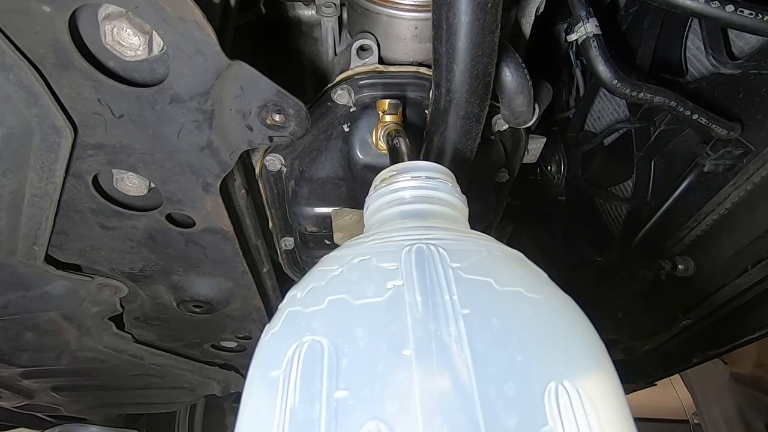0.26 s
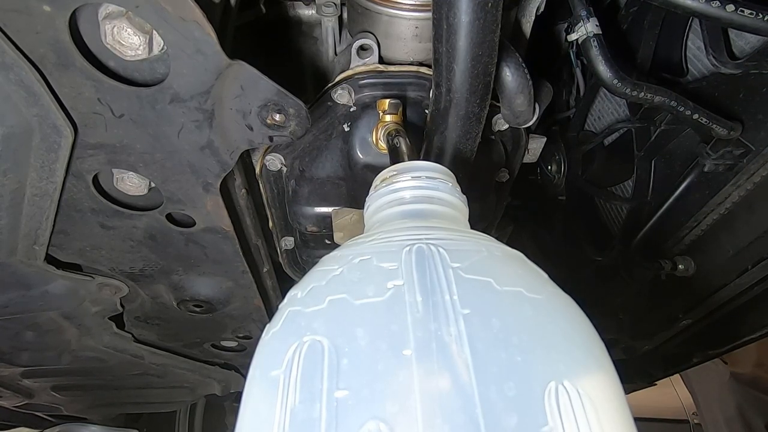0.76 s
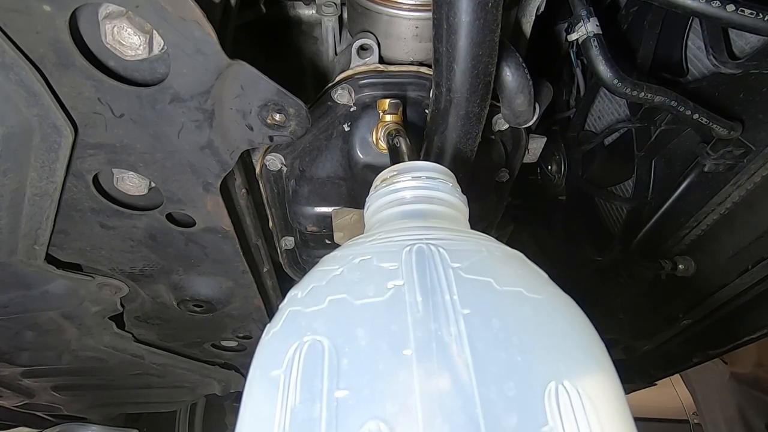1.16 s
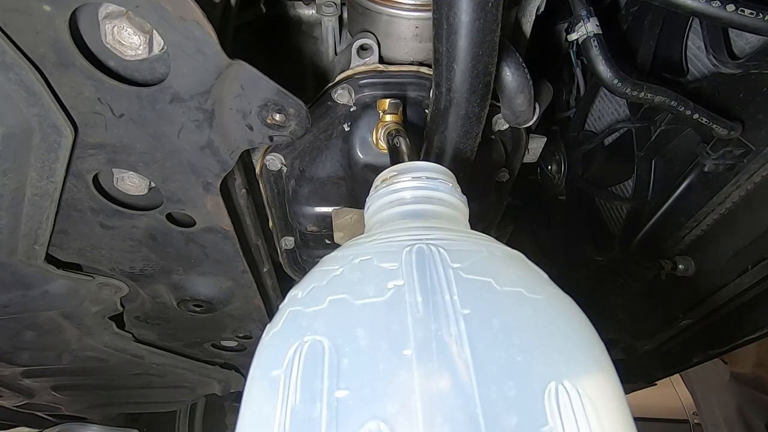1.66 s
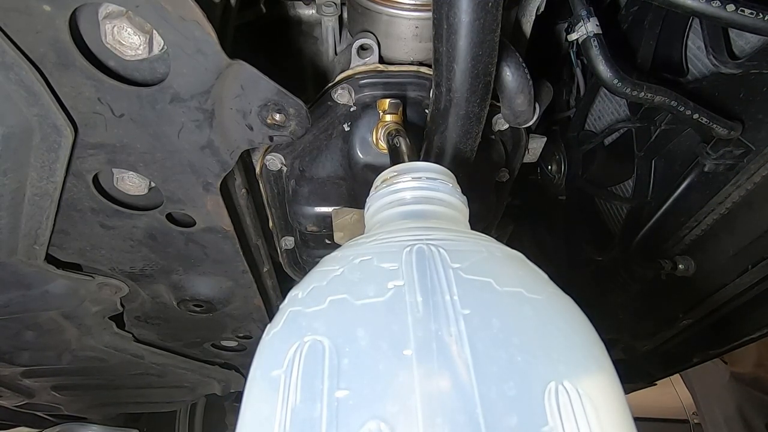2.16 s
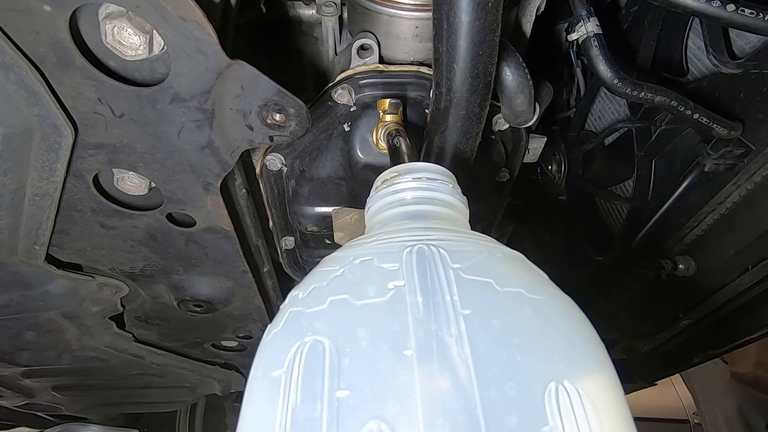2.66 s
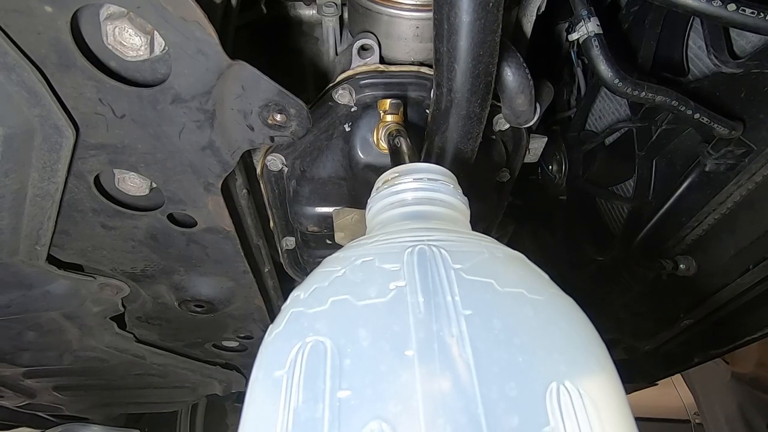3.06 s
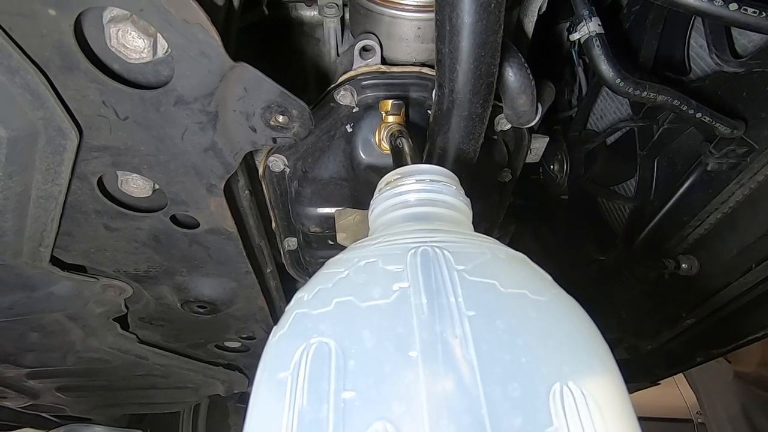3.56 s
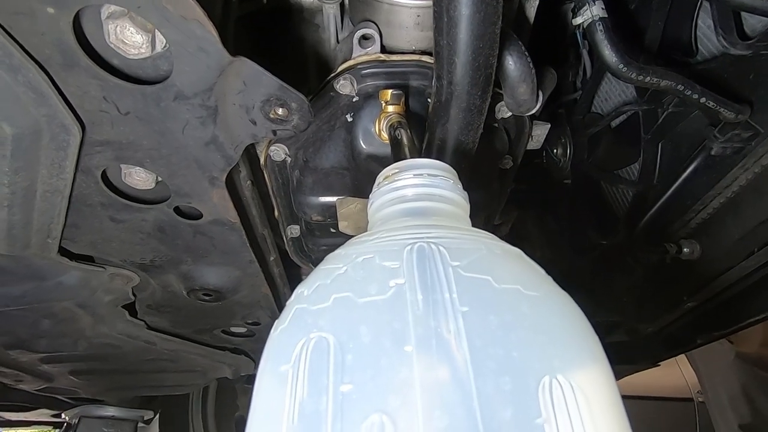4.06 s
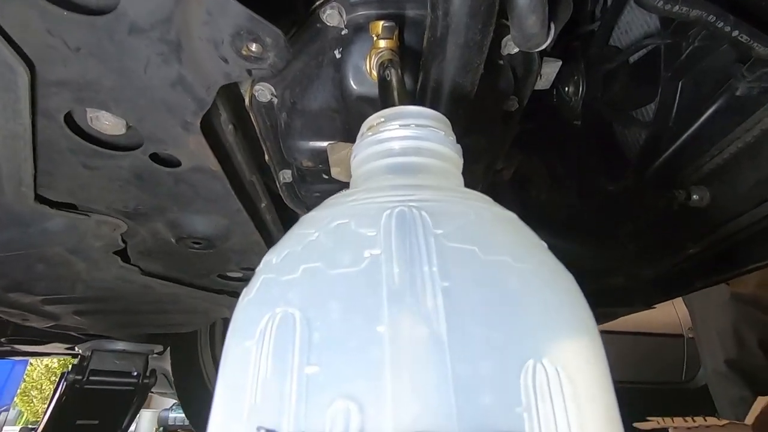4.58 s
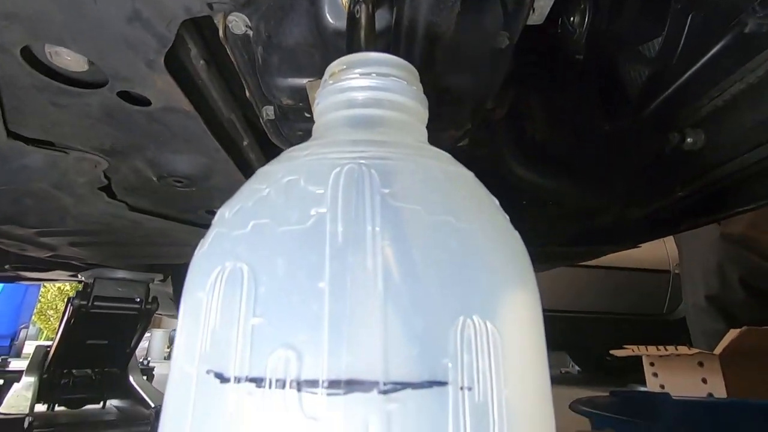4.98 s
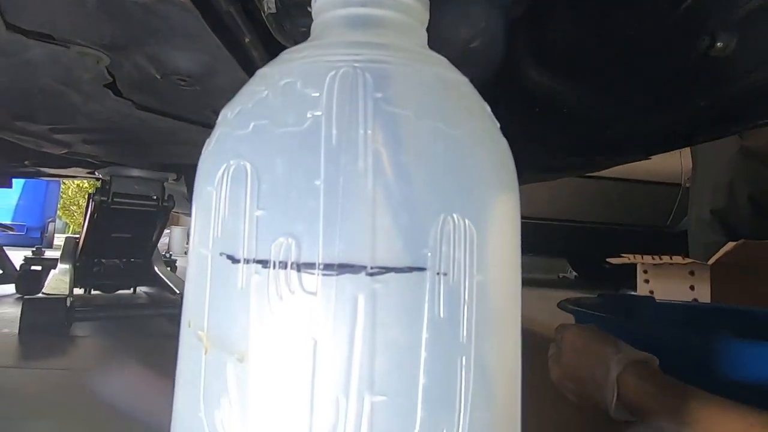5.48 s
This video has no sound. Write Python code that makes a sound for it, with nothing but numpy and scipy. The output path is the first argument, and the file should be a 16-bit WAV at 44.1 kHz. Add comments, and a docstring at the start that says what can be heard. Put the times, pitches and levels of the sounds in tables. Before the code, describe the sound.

Nearly silent low rumble and light crinkles beneath a car give way to loud close handling noise: skin drags, quick creaks, dull taps, cloth scrapes.

```python
"""Under a car, at arm's length, oil runs almost silently into a jug: a low murmur, light rustles and tiny ticks.
Then the hand shifts its grip on the camera: rough skin drags, sticks and slips on the case, whose modes shake
the two microphone ports mostly in opposite directions. A sleeve scrapes along as the camera is drawn back:
its fibres catch and let go. Bursts of friction make the strokes, kicks ring the case in taps and creaks,
tones waver where skin judders, and filtered noise makes the low bed, a faint hiss and a distant roar."""
import sys
import numpy as np
from scipy import signal
from scipy.fft import rfft, irfft, next_fast_len
from scipy.io import wavfile
from scipy.ndimage import uniform_filter1d, map_coordinates

SR = 44100
rng = np.random.default_rng(int(sys.argv[2]) if len(sys.argv) > 2 else 0)


def store_wav(level_fs):
    """Save 16-bit WAV to argv[1]."""
    pcm = np.round(np.clip(np.atleast_2d(level_fs), -1, 1) * 32767)
    wavfile.write(sys.argv[1], SR, pcm.T.astype(np.int16))


N = 252374

# modes of the free camera case:
# (frequency [Hz], width [Hz], level [dB], left over right [dB], polarity of the right port [+1 or -1])
CASE_MODES = [(369, 55.5, 3.5, -9.5, -1), (753, 162, -1.5, 1, -1), (973, 86, -0.5, 0, -1),
              (1231, 90.5, 4.5, 0.5, -1), (1635, 343, -9.5, 5.5, -1), (1838, 300, -9.5, 1, 1),
              (2345, 89, -14, 7.5, -1), (2790, 430, -17, -1.5, 1), (3886, 68, -5.5, -2, 1),
              (4010, 290, -12.5, -4.5, 1), (4670, 230, -19.5, -17.5, 1), (4995, 140, -19.5, -18.5, -1),
              (6020, 380, -25.5, -11, -1), (6550, 500, -34.5, -6, -1), (7600, 640, -27, -12, 1),
              (9120, 550, -30, -7.5, 1)]
# modes of the same case under a pressing fingertip:
# (frequency [Hz], width [Hz], level [dB], left over right [dB], polarity of the right port [+1 or -1])
PRESSED_MODES = [(388, 46, -1.5, -10, -1), (900, 179, -16.5, 0.5, -1), (1260, 198, -10, -3.5, -1),
                 (2050, 630, -22, 8, -1), (2483, 77, -16.5, -5, -1), (2940, 269, -37, -8, -1),
                 (4090, 97, -16.5, -4, 1), (5100, 190, -42, -14, -1), (5950, 156, -39, -6, 1),
                 (7900, 1100, -51.5, -10, -1)]


def fingers():
    """Skin drags over the case: pressure drives the low modes, fine roughness the high ones."""
    # finger strokes: (start [s], swell [s], ease [s], relative pressure [dB], hiss over pressure [dB])
    rubs = [(2.87, 0.033, 0.014, -48.5, -10), (3.385, 0.022, 0.14, -45.5, -4.5),
            (3.495, 0.025, 0.025, -42.5, -7), (3.567, 0.073, 0.065, -44.5, -7.5),
            (3.68, 0.013, 0.048, -47.5, -3.5), (3.742, 0.01, 0.014, -39, -4),
            (3.798, 0.005, 0.03, -46, -10.5), (3.85, 0.028, 0.46, -46, -6.5),
            (3.975, 0.071, 0.11, -40, -6.5), (4.205, 0.06, 0.085, -40.5, -4),
            (4.726, 0.0038, 0.1, -34, -5.5), (4.775, 0.065, 0.04, -31, -6.5),
            (4.875, 0.011, 0.047, -34.5, -11.5), (5.037, 0.041, .01, -38, -9),
            (5.085, 0.012, 0.029, -34, -16), (5.155, 0.0066, 0.012, -42.5, -18),
            (5.194, 0.0059, 0.019, -44.5, -18), (5.275, 0.022, 0.017, -38.5, -13.5),
            (5.34, .13, .015, -54.5, -21)]
    # contour of a rub: (attack [s], swell [dB], ease [dB], release [s])
    rub_shape = (0.0044, 3.7, 5.35, 0.026)
    # light brushes: (start [s], swell [s], ease [s], relative pressure [dB], hiss over pressure [dB])
    brushes = [(.15, 0.023, 0.023, -61, 5), (1.97, 0.23, 0.18, -61.5, -8), (2.16, 0.054, 0.052, -50, -7.5)]
    # contour of a brush: (attack [s], swell [dB], ease [dB], release [s])
    brush_shape = (0.018, 10, 18.6, .04)
    # a fingertip slides up to the port: (start [s], swell [s], ease [s], relative peak [dB])
    slides = [(2.14, 0.072, 0.036, -60.5), (2.955, 0.016, 0.05, -61.5), (3.175, 0.025, 0.046, -52),
              (3.245, 0.048, 0.085, -42)]
    # contour of a slide: (attack [s], swell [dB], ease [dB], release [s])
    slide_shape = (0.051, 8.7, 11.2, 0.021)
    # force spectrum of the fingertip: (frequency [Hz], level [dB])
    fingertip_force = [(200, -9.5), (420, -13), (750, -13.5), (1250, -17), (1600, -11.5), (2600, -9),
                       (3300, -7.5), (4100, -4), (6000, -2), (9000, -1), (13000, -5.5)]
    # force spectra of soft pressure and fine roughness: (frequency [Hz], level [dB])
    soft = [(150, 20.5), (370, -10.0), (750, 6.5), (1300, 5.5), (2600, -1.0), (3600, -13.5), (5500, -37.5)]
    fine = [(1200, -51.0), (2300, 8.5), (3800, -5.5), (8500, 0.0), (9700, -10.5), (15000, -34)]

    pressure, roughness = touch(rubs, rub_shape) + touch(brushes, brush_shape)
    press = rubbed(CASE_MODES, soft, rate=1500, clump_db=1.0, side_db=-17.5) * pressure
    hiss = rubbed(CASE_MODES, fine, rate=3200, clump_db=0.85, side_db=-4.5) * roughness
    slide = rubbed(PRESSED_MODES, fingertip_force, rate=3000, clump_db=1.0, side_db=-9.0)
    slide = slide * strokes(slides, slide_shape)
    return amp(8.5) * press + amp(5) * hiss + amp(7.5) * slide


def slips():
    """Short releases of the sticking fingertip, and duller taps that skid a little longer."""
    # the fingertip sticks and lets go in a short creak: (time [s], relative level [dB], edge [dB])
    creak = [(3.5602, -27.5, -7), (3.5767, -24.5, -6), (3.5922, -25.5, -6), (3.6058, -23, -3),
             (3.6550, -20, 10), (3.6747, -21, 4.5), (3.7047, -21, 3), (3.7406, -20.5, -2)]
    # force spectrum of a release before its edge: (frequency [Hz], level [dB])
    release_force = [(60, -1), (420, 2), (750, -2.5), (1900, 1.5), (3000, -3.5), (4100, -4), (5200, 0),
                     (12000, -2.5)]
    # fingers tap the case: (time [s], relative level [dB], edge [dB])
    taps = [(2.934, -32, -16), (3.796, -37, -10), (3.849, -29, -18.5), (3.979, -27, -20),
            (4.074, -26.5, -19), (4.197, -32, -26), (4.343, -32, -16), (4.4402, -38, -22.5),
            (4.498, -22.5, -23.5), (4.619, -38.5, -18.5), (4.7235, -33, -17), (5.1538, -21, -36),
            (5.192, -32, -29), (5.2555, -14, -29), (5.294, -18.5, -33)]

    out = np.zeros((2, N))
    for s, db, edge_db in creak:
        # the edge lifts or lowers the force around 4 kHz
        force = [(hz, level + edge_db * (3000 < hz < 5000)) for hz, level in release_force]
        ring = struck(PRESSED_MODES, force, skid=0.11, skid_t60=0.014)
        add(out, s, amp(db - 11.5) * ring)
    for s, db, edge_db in taps:
        contact = [(150, 11.0), (400, -20.5), (700, 1.5), (1250, 0.5), (1800, 4),
                   (4000, edge_db + 3), (8500, edge_db + 12.5), (14000, edge_db - 16)]
        ring = struck(CASE_MODES, contact, skid=0.11, skid_t60=0.035)
        add(out, s, amp(db - 13) * ring)
    return out


def judders():
    """Slow judders move both ports together; quick squeaks bend the case and move them in opposition."""
    # skin judders: (start [s], length [s], mean rate [Hz], level [dB], left over right [dB])
    judder_rows = [(0.346, 0.1, 248, -41.5, -2), (1.97, 0.092, 185.8, -42.5, 0),
                   (1.99, 0.15, 97, -41.5, -1.5), (2.16, 0.13, 102.4, -40.5, -1.5),
                   (2.43, 0.11, 113.5, -41, -1), (2.852, 0.039, 254, -46, -14),
                   (2.866, 0.07, 95.3, -39, -18), (2.868, 0.047, 380.5, -46.5, -19.5),
                   (2.87, 0.057, 195, -40.5, -16), (3.383, 0.043, 123, -42, -16),
                   (3.41, 0.044, 204, -54, -20), (3.647, 0.079, 134.4, -39, -15),
                   (3.849, 0.059, 184.7, -35.5, -24.5), (3.931, 0.028, 200, -49, -26),
                   (4.032, 0.083, 198.5, -39, -27.5), (4.08, 0.082, 167.3, -37, -26),
                   (4.868, 0.039, 177.6, -34.5, -12)]
    # thin squeaks of skin: (start [s], length [s], mean rate [Hz], mean level [dB], left over right [dB])
    squeak_rows = [(0.146, 0.056, 1510, -49, 0.5), (3.265, 0.08, 1500, -53, 3)]
    slow = stick_slip(judder_rows, unsteady=0.044, overtone=0.12)
    quick = stick_slip(squeak_rows, unsteady=0.012, overtone=0.1) * amp(2.5 * wobble(110))
    return slow + quick * [[1], [-1]]


def sleeve():
    """Cloth scrapes in strokes, nearly alike at both ports."""
    # sleeve strokes: (start [s], swell [s], ease [s], relative peak [dB])
    scrapes = [(5.046, .02, .02, -38.5), (5.075, 0.023, 0.036, -32.5), (5.192, 0.0033, 0.013, -44),
               (5.235, 0.029, 0.0069, -38.5), (5.279, 0.0063, 0.023, -29.5), (5.32, 0.0063, 0.11, -45),
               (5.375, 0.11, 0.0035, -35.5), (5.524, 0.05, 0.18, -36.5), (5.63, 0.091, 0.054, -36)]
    # contour of a scrape: (attack [s], swell [dB], ease [dB], release [s])
    scrape_shape = (0.017, 7.5, 9.3, 0.029)
    # spectrum of the scraping cloth: (frequency [Hz], level [dB])
    scrape_spectrum = [(400, -17), (700, -14.5), (1300, -8), (1900, -1), (2350, -2.5), (2700, -11.5),
                       (2930, -4.5), (3250, -11.5), (3750, -19.5), (4080, -9.5), (4500, -19.5),
                       (5000, -29.5), (6000, -27), (6450, -33), (7500, -31.5), (10000, -43), (15000, -42)]
    scrape = cloth(scrape_spectrum, rate=2800, clump_db=1.0, side_db=-44, hiss=0.87)
    return amp(0.93) * scrape * strokes(scrapes, scrape_shape)


def rustle():
    """The hand that holds the jug rustles lightly: sparse, wide friction, stronger at the right port."""
    # rustles: (start [s], swell [s], ease [s], relative peak [dB])
    rustles = [(.148, 0.03, 0.08, -44.5), (.325, 0.051, 0.12, -53), (.41, 0.11, 0.19, -56),
               (.63, 0.021, 0.18, -58.5), (.725, 0.016, 0.14, -52.5), (.86, 0.086, 0.13, -63),
               (.975, 0.11, 0.042, -57), (1.19, 0.034, 0.031, -67), (1.97, 0.13, 0.26, -67),
               (2.15, 0.068, 0.08, -56.5), (2.43, 0.039, 0.096, -70), (2.945, 0.013, 0.15, -55.5),
               (3.02, 0.083, 0.15, -59.5), (3.25, 0.043, 0.09, -49)]
    # contour of a rustle: (attack [s], swell [dB], ease [dB], release [s])
    rustle_shape = (0.054, 9.9, 18.6, 0.34)
    # spectrum of the crinkling: (frequency [Hz], level [dB])
    crinkle_spectrum = [(600, -60), (1300, -9.5), (2000, -7.5), (3000, 0), (4500, -4), (7200, -5.5),
                        (9500, -12), (15000, -10)]
    crinkle = cloth(crinkle_spectrum, rate=900, clump_db=1.2, side_db=-1, hiss=0.8)
    return amp(2.0) * pan(-5.0) * crinkle * strokes(rustles, rustle_shape)


def ticks():
    """Bright ticks of a few milliseconds: decaying noise bursts, stronger at the right port."""
    # tiny ticks: (time [s], relative level [dB])
    tick_rows = [(0.178, -37), (0.223, -43), (0.298, -43), (0.366, -40.5), (0.645, -41), (0.748, -39),
                 (0.781, -42.5), (0.804, -44), (0.875, -49), (0.908, -39), (0.972, -38), (1.027, -44.5),
                 (1.058, -62), (1.13, -48.5), (1.221, -50), (1.311, -47), (1.374, -44.5), (1.389, -44),
                 (2.2967, -51), (2.307, -47), (2.342, -53.5), (2.441, -44), (2.492, -49), (2.576, -49),
                 (2.601, -51), (2.639, -52.5)]
    # spectrum of a tick: (frequency [Hz], level [dB])
    tick_spectrum = [(1500, -13), (3500, -8.5), (5500, -3.5), (7700, -8), (9500, -19.5), (15000, -30)]
    out, t = np.zeros((2, N)), np.arange(SR // 30) / SR
    for s, db in tick_rows:
        noise = spread(*rng.standard_normal((2, len(t))), side_db=3)
        snap = noise * amp(-60 * t / 0.012)  # falls 60 dB in 12 ms
        add(out, s, amp(db - 21.5) * unit(filtered(snap, colour(tick_spectrum))))
    return out * pan(-10.5)


def roar():
    """A dull, uneven swell from far away: low-filtered noise whose level wavers."""
    # the roar swells and fades: (start [s], swell [s], ease [s], relative peak [dB])
    swells = [(1.495, 0.45, 0.75, -58.5)]
    # its contour: (attack [s], swell [dB], ease [dB], release [s])
    roar_shape = (0.18, 15, 8.3, 0.27)
    # its spectrum: (frequency [Hz], level [dB])
    dull_spectrum = [(200, -12.5), (340, 2), (520, -3), (750, -3.5), (1100, -30), (2000, -38)]
    pair = widened(*rng.standard_normal((2, N)), side_db=-1.0)
    pair = unit(filtered(pair, colour(dull_spectrum)))
    return pair * strokes(swells, roar_shape) * amp(1.1 * wobble(12.05))


def background():
    """Rumble and murmur swell as the hand shifts and lean with the palm's grip, over a faint hiss."""
    # bass before offsets and wavering: (time [s], rumble level [dB], murmur level [dB])
    low_levels = [(0.0, -51, -49.5), (0.51, -64, -48.5), (0.73, -57, -50), (1.45, -55.5, -50.5),
                  (1.91, -59.5, -45), (2.2, -50, -49.5), (2.55, -55.5, -47.5), (2.88, -53, -52),
                  (3.22, -57.5, -51.5), (3.43, -62, -58), (3.58, -41.5, -53.5), (4.01, -51, -43.5),
                  (4.41, -55, -50.5), (4.7, -52.5, -54), (4.89, -51, -46.5), (5.72, -50, -41.5)]
    # spectrum of the rumble: (frequency [Hz], level [dB])
    rumble_spectrum = [(15, -30), (35, 0), (60, 4), (115, 4.5), (160, -14), (300, -47.5)]
    # spectrum of the murmur: (frequency [Hz], level [dB])
    murmur_spectrum = [(80, -31.5), (130, -6), (185, -1), (235, -5.5), (290, -7.5), (380, -15.5),
                       (500, -30.5), (900, -83)]
    # spectrum of the faint background hiss: (frequency [Hz], level [dB])
    hiss_spectrum = [(200, -15), (400, -8), (700, -13), (1100, -20), (1900, -24), (3000, -29), (4000, -32),
                     (8000, -42.5), (9600, -39.5), (11000, -47), (15000, -47)]
    # the palm presses near the right port: (time [s], bass at the right port over the left [dB])
    grip = [(0, 1), (2.78, 0.5), (2.88, 4), (3.3, 7), (4.3, 8), (4.9, 6), (5.1, -1.5), (5.72, -2.5)]
    # the hand shifts its weight: (start [s], swell [s], ease [s], rumble [dB], murmur over rumble [dB])
    shifts = [(1.98, 0.037, 0.17, -48.5, -2), (2.12, 0.14, 0.078, -47, -2), (2.865, 0.035, 0.077, -44, 2),
              (3.382, 0.018, 0.17, -40, -5.5), (3.55, 0.042, 0.11, -42.5, 2), (4.729, 0.016, 0.091, -43, 5),
              (4.82, 0.065, 0.021, -48, 6.5)]
    # contour of a shift: (attack [s], swell [dB], ease [dB], release [s])
    shift_shape = (0.012, 3, 9.7, .05)
    rumble_db, murmur_db, hiss_db = 4.5, 1.13, -62  # offsets of the two bass curves; unmuffled hiss level
    shade = 0.36  # the palm also muffles the hiss: dB lost per dB of grip toward the right

    def bass(spectrum, side_db):
        """Stereo noise of a given spectrum and width."""
        pair = spread(*rng.standard_normal((2, N)), side_db)
        return unit(filtered(pair, colour(spectrum)))

    grip_db = curve(grip)
    shake, drag = touch(shifts, shift_shape)
    rumble_gain = np.hypot(amp(curve(low_levels, axis=1) + rumble_db), shake)
    murmur_gain = np.hypot(amp(curve(low_levels, axis=2) + murmur_db), drag)
    rumble = rumble_gain * bass(rumble_spectrum, side_db=-16.0 + 1.0 * grip_db)
    murmur = murmur_gain * bass(murmur_spectrum, side_db=-17.0 + 2.14 * grip_db)
    low = rumble * amp(1.84 * wobble(4.985)) + murmur * amp(1.93 * wobble(8))
    hiss = unit(filtered(widened(*rng.standard_normal((2, N)), side_db=0), colour(hiss_spectrum)))
    hiss_gain = amp(hiss_db - shade * np.maximum(grip_db, 0))
    return low * pan(-grip_db) + hiss_gain * hiss


def case(f, modes, lag_s=65e-6):
    """Response of the two ports to a force on the case; the bending reaches the left one a little later."""
    ports = 0
    for k, (hz, width, db, lean_db, polarity) in enumerate(modes):
        resonance = 1j * f * width / (hz * hz - f * f + 1j * f * width)
        mode = (-1) ** k * amp(db) * resonance  # neighbouring modes alternate in sign
        ports = ports + mode * pan(lean_db) * [[1], [np.sign(polarity)]]
    rebound = echoes(f, [(0.0008, -13)])  # the wave returns from the far edge of the case
    return ports * rebound * np.exp(-2j * np.pi * f * lag_s * np.array([[1], [0]]))


def rubbed(modes, force, rate, clump_db, side_db):
    """Friction with a given force spectrum on the case; each port also hears its own patch of skin."""
    pair = spread(friction(rate, clump_db), friction(rate, clump_db), side_db)
    return unit(filtered(pair, lambda f: case(f, modes) * colour(force)(f)))


def struck(modes, force, skid, skid_t60):
    """The case rings after one kick and a short skid, of a given force spectrum."""
    t = np.arange(SR // 12) / SR
    push = skid * rng.standard_normal(len(t)) * amp(-60 * t / skid_t60)
    push[0] = 1
    kick = signal.fftconvolve(push, causal(force))[:len(t)]
    kick = np.pad(kick, (SR // 2000, 0))  # half a millisecond of silence ahead
    return unit(filtered(kick, lambda f: case(f, modes)))


def stick_slip(rows, unsteady, overtone):
    """Skin that sticks and slips at an unsteady rate gives short, wavering tones."""
    out, drift = np.zeros((2, N)), wobble(60)
    for s, length, hz, db, lean_db in rows:
        n = int(length * SR)
        rate_hz = hz * (1 + unsteady * drift[round(s * SR):][:n])
        phase = 2 * np.pi * np.cumsum(rate_hz) / SR
        tone = np.sin(phase) + overtone * np.sin(2 * phase)
        add(out, s, amp(db) * pan(lean_db) * signal.windows.tukey(n, 0.7) * tone)
    return out


def cloth(spectrum, rate, clump_db, side_db, hiss):
    """Fibres catch and let go, heard through the air between floor and car."""
    # echoes from the floor and the underbody: (delay [s], level [dB])
    walls = [(0.0023, -27), (0.0061, -12.5), (0.0131, -17.5)]
    pair = widened(friction(rate, clump_db, hiss), friction(rate, clump_db, hiss), side_db)
    return unit(filtered(pair, lambda f: colour(spectrum)(f) * echoes(f, walls)))


def friction(rate, clump_db, hiss=1.0):
    """Tiny catches of a rough surface, rate a second, in clumps, over a smooth hiss."""
    catches = (rng.random(N) < rate / SR) * rng.standard_normal(N)
    grain = unit(catches) + hiss * rng.standard_normal(N)
    return unit(patches(grain * amp(clump_db * wobble(130)), depth_db=3.5))


def patches(x, depth_db):
    """The colour shifts as the point of contact wanders: random gains some 400 Hz wide and 60 ms long."""
    z = signal.stft(x, nperseg=512)[2]
    field = uniform_filter1d(rng.standard_normal(z.shape), size=5, axis=0)  # across frequency
    field = uniform_filter1d(field, size=11, axis=1)  # across time
    return signal.istft(z * amp(depth_db * unit(field)), nperseg=512)[1][..., :N]


def strokes(rows, shape):
    """Gain of (start, swell, ease, dB) strokes: each catches, swells to its peak, eases and lets go."""
    edge_db = 20.5  # climb in the attack and drop in the release
    attack_s, swell_db, ease_db, release_s = shape
    t, gain = np.arange(N) / SR, np.zeros(N)
    for s, swell_s, ease_s, db in rows:
        # the attack ends at the listed start
        knots = s - attack_s + np.cumsum(np.abs([0, attack_s, swell_s, ease_s, release_s]))
        below_db = [swell_db + edge_db, swell_db, 0, ease_db, ease_db + edge_db]
        on = slice(*np.searchsorted(t, knots[[0, -1]]))
        stroke = amp(db - np.interp(t[on], knots, below_db))
        gain[on] = np.maximum(gain[on], stroke)
    return gain


def touch(rows, shape):
    """Gains of the deeper and the brighter layer of each stroke; both share its shape."""
    deep = [(s, swell, ease, db) for s, swell, ease, db, over_db in rows]
    bright = [(s, swell, ease, db + over_db) for s, swell, ease, db, over_db in rows]
    return np.array([strokes(deep, shape), strokes(bright, shape)])


def widened(a, b, side_db):
    """A stereo pair whose width changes with frequency, as the camera's stereo processing shapes it."""
    # stereo width: (frequency [Hz], opposed part over shared, before side_db [dB])
    stereo_width = [(400, -5.5), (800, 3), (1600, 3), (2400, 0.5), (4200, -4), (5500, 2.5), (9000, 3.5)]
    return spread(a, filtered(b, colour(stereo_width)), side_db)


def echoes(f, rows):
    """Response of a direct sound plus (delay [s], level [dB]) copies."""
    return 1 + sum(amp(db) * np.exp(-2j * np.pi * f * delay) for delay, db in rows)


def causal(points, size=4096):
    """Impulse response with a given spectrum and its energy at the start (minimum phase)."""
    cepstrum = irfft(np.log(colour(points)(np.fft.rfftfreq(size, 1 / SR))))
    cepstrum[1:size // 2] *= 2
    cepstrum[size // 2 + 1:] = 0
    return irfft(np.exp(rfft(cepstrum)))


def amp(db):
    """Decibels to gain."""
    return 10 ** (np.asarray(db) / 20)


def unit(x):
    """Scale to rms 1."""
    return x / np.sqrt(np.mean(x ** 2) + 1e-20)


def colour(points):
    """Gain against frequency through (frequency [Hz], level [dB]) points on a log axis."""
    f, db = np.transpose(points)
    return lambda hz: amp(np.interp(np.log(hz + 1), np.log(f + 1), db))


def curve(rows, axis=1):
    """One column of a table, per sample."""
    rows = np.asarray(rows)
    return np.interp(np.arange(N) / SR, rows[:, 0], rows[:, axis])


def wobble(rate):
    """A smooth random curve, rate knots a second."""
    knots = rng.standard_normal(int(N * rate / SR) + 4)
    return map_coordinates(knots, [np.arange(N) * rate / SR])


def filtered(x, response):
    """x times a complex response of frequency."""
    n = x.shape[-1]
    m = next_fast_len(n + 8192)  # room for the tail
    return irfft(rfft(x, m) * response(np.fft.rfftfreq(m, 1 / SR)), m)[..., :n]


def pan(db):
    """Left and right gains for a left-right difference."""
    return amp(np.array([[0.5], [-0.5]]) * db)


def spread(a, b, side_db):
    """A stereo pair from a shared and an opposed signal."""
    opposed = amp(side_db) * b
    return np.array([a + opposed, a - opposed])


def add(track, s, sound):
    """Mix a short sound in at time s."""
    part = track[..., round(s * SR):][..., :sound.shape[-1]]
    part += sound[..., :part.shape[-1]]


def scene():
    """Handling on the case, cloth and ticks through the air, the distant roar and the background."""
    handling = fingers() + slips() + judders()
    through_air = sleeve() + rustle() + ticks()
    return handling + through_air + roar() + background()


def record(dry):
    """The camera dulls the top octave and keeps nothing above its band limit."""
    # loss of the treble: (frequency [Hz], level [dB])
    treble = [(9700, -0.5), (10400, -11), (15000, -26)]
    top_hz = 15000
    return filtered(dry, lambda hz: colour(treble)(hz) * (hz < top_hz))


dry = scene()
out = record(dry)
store_wav(out)
```